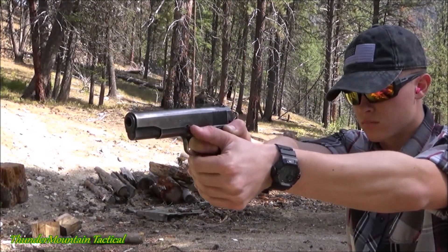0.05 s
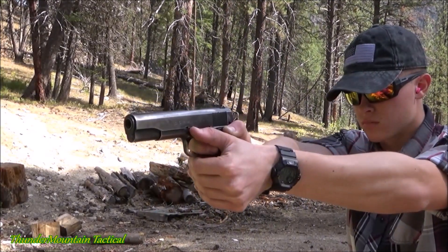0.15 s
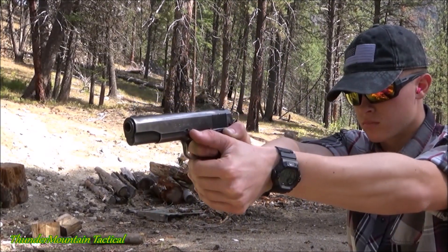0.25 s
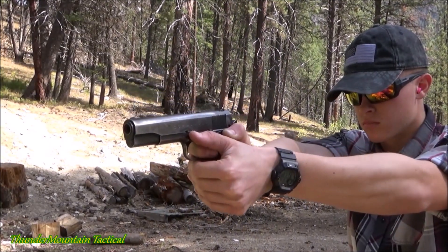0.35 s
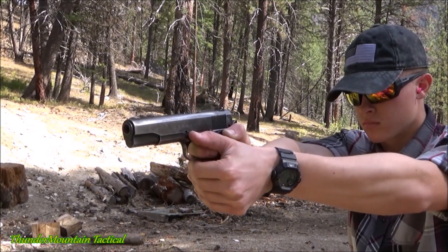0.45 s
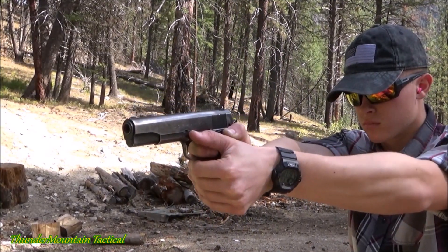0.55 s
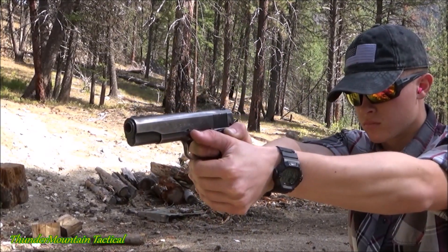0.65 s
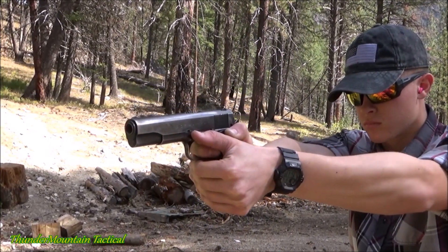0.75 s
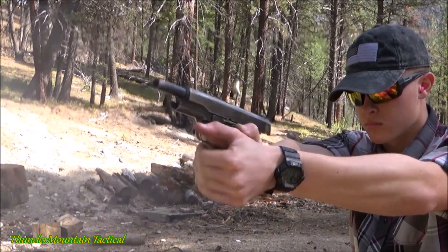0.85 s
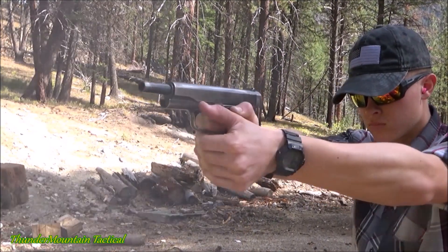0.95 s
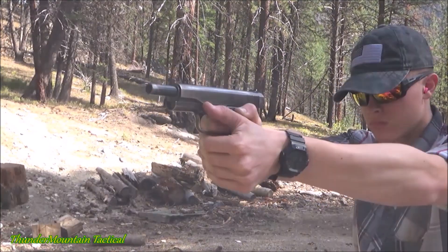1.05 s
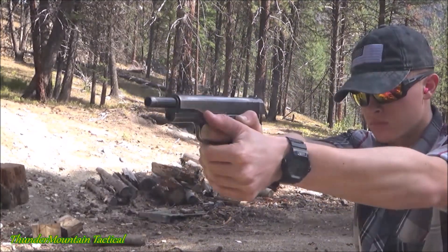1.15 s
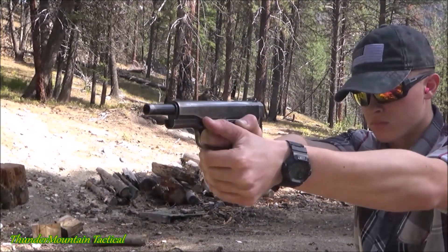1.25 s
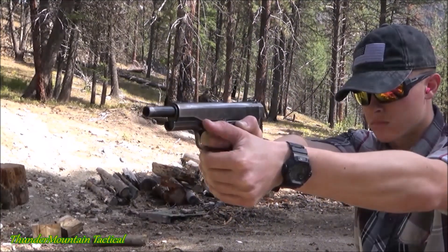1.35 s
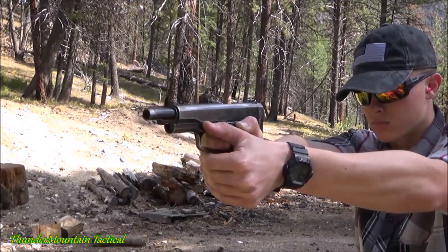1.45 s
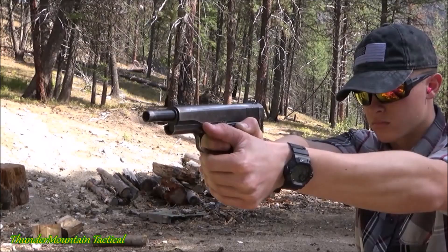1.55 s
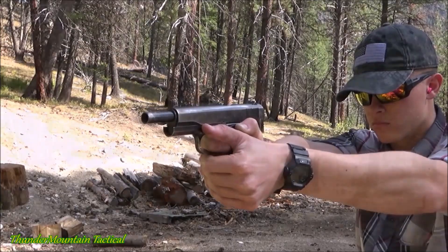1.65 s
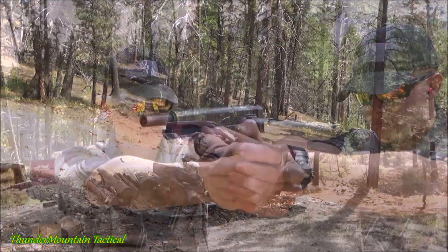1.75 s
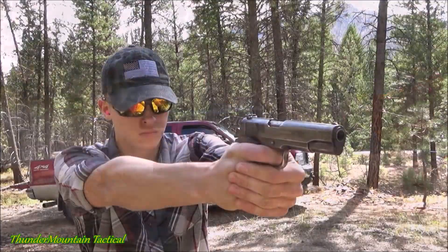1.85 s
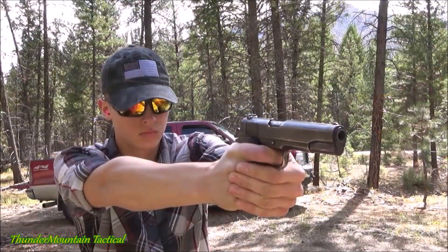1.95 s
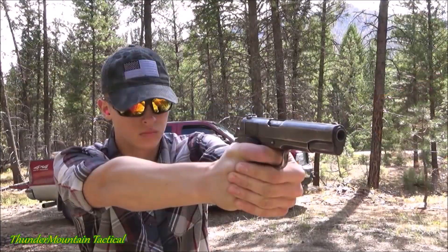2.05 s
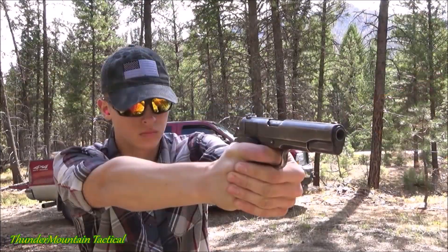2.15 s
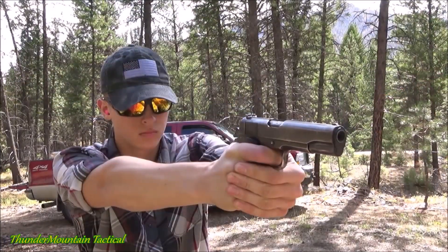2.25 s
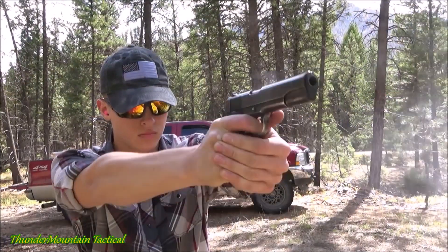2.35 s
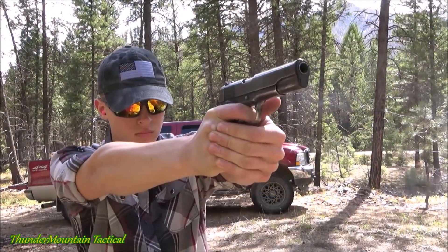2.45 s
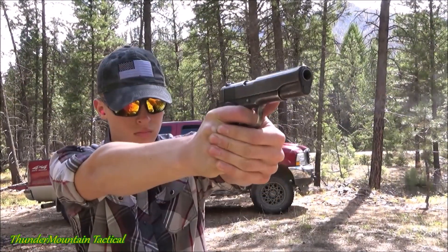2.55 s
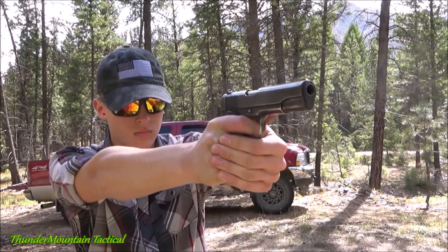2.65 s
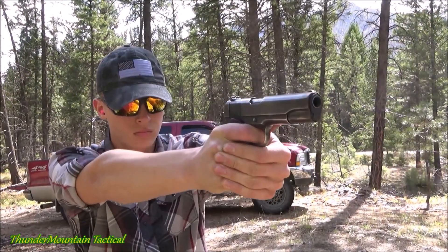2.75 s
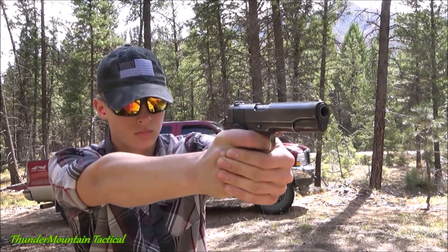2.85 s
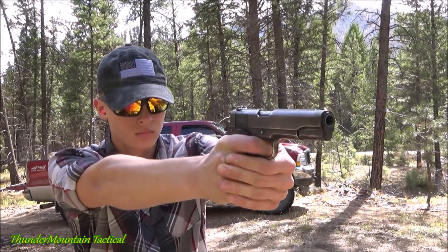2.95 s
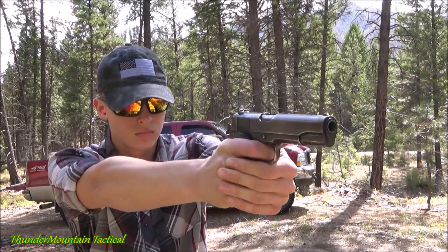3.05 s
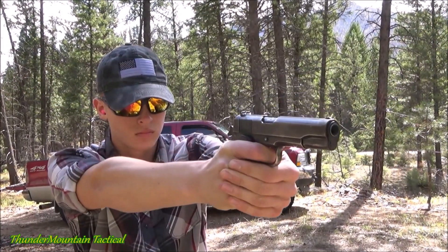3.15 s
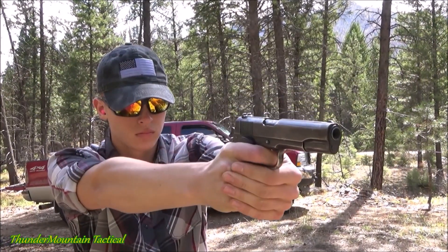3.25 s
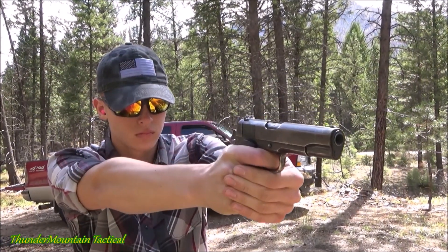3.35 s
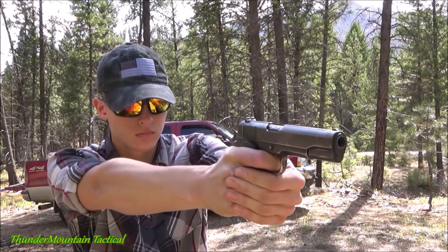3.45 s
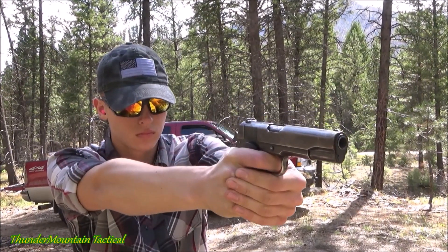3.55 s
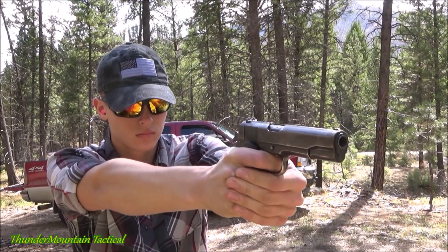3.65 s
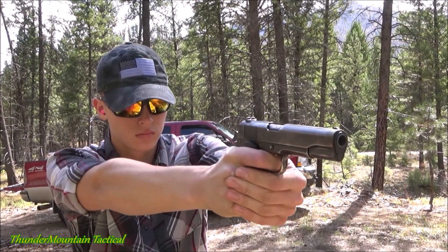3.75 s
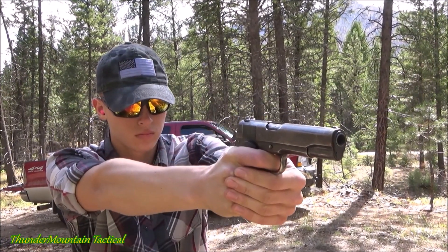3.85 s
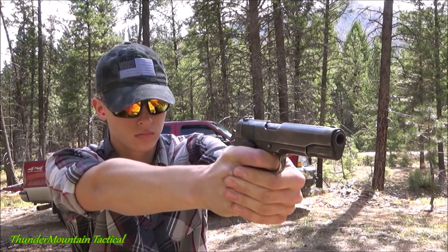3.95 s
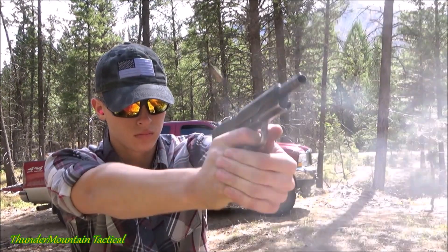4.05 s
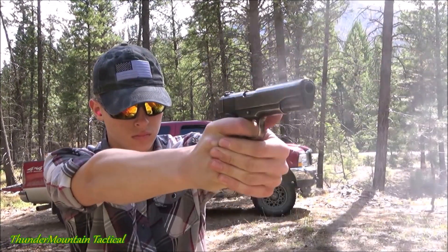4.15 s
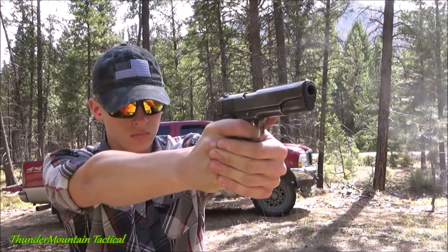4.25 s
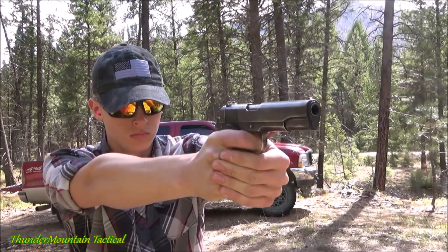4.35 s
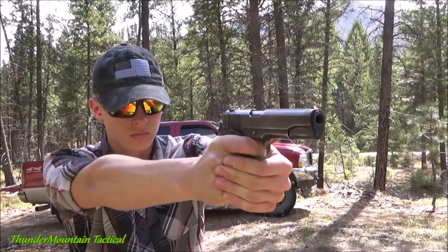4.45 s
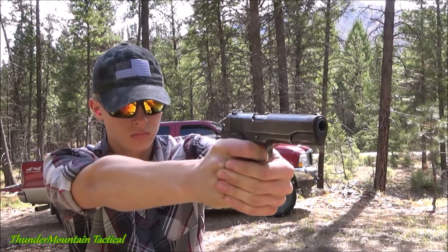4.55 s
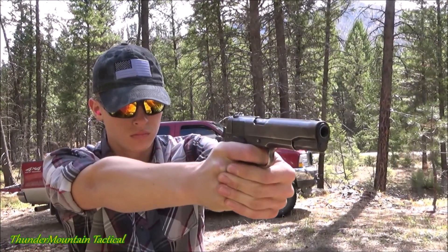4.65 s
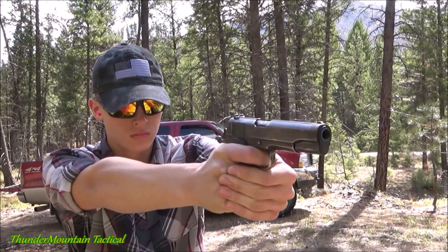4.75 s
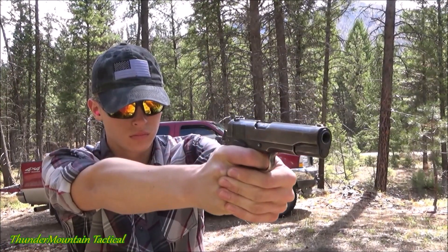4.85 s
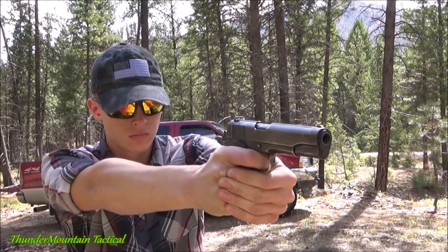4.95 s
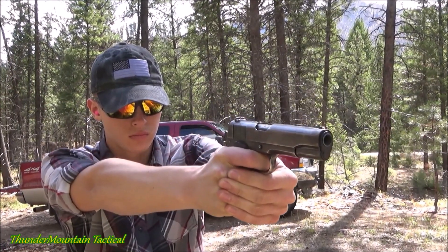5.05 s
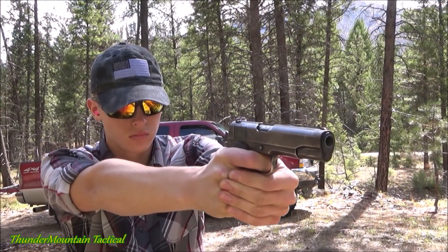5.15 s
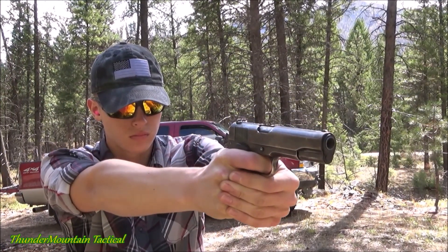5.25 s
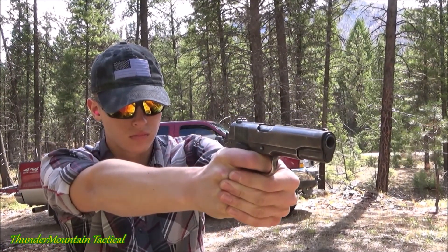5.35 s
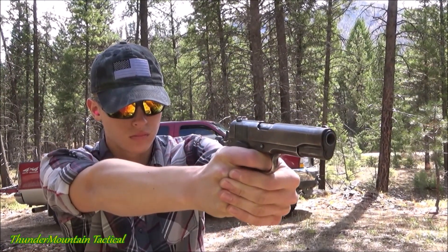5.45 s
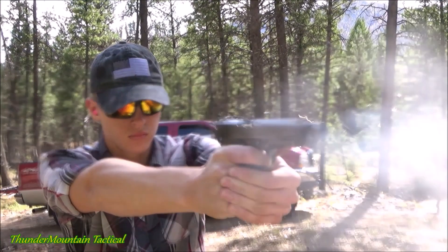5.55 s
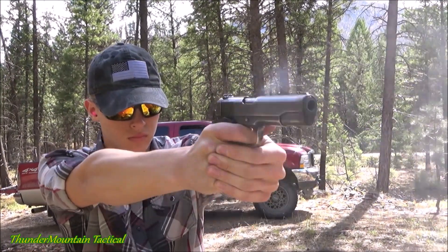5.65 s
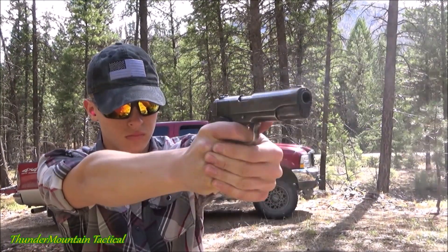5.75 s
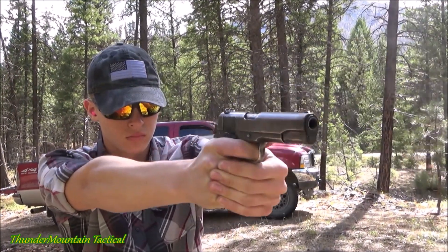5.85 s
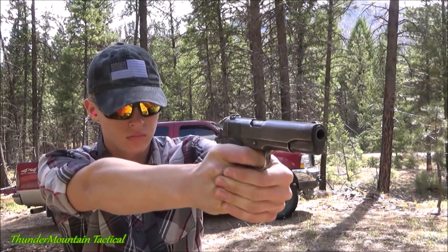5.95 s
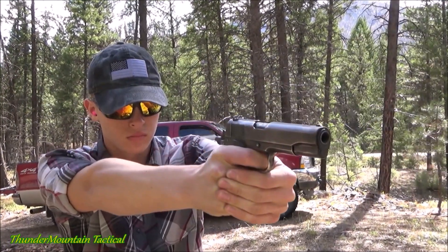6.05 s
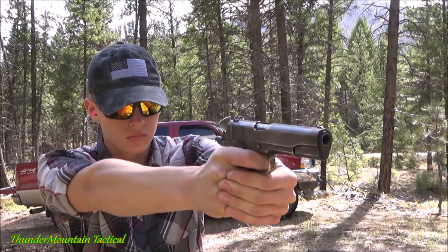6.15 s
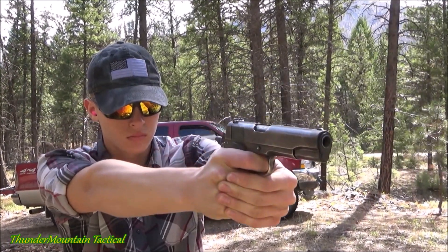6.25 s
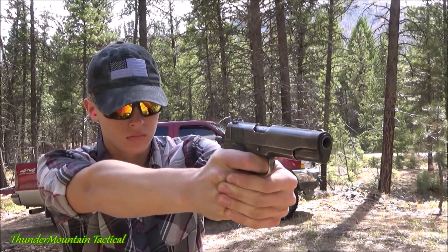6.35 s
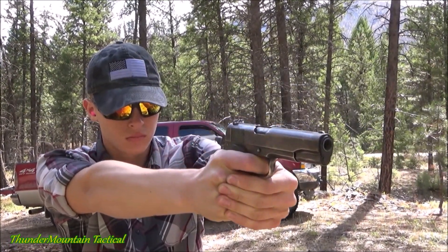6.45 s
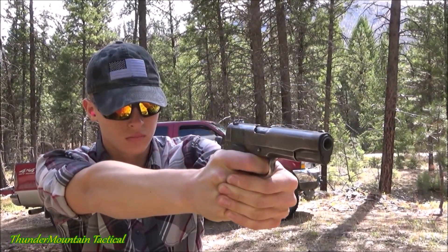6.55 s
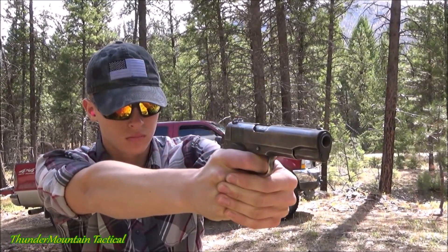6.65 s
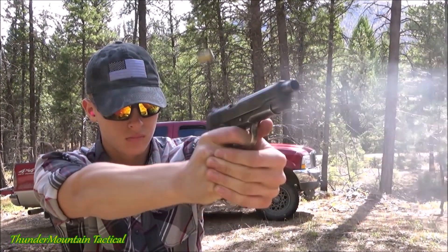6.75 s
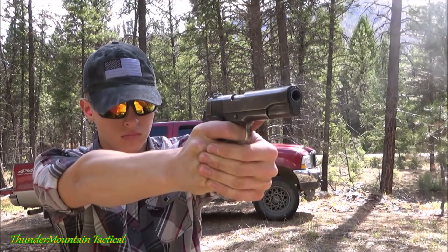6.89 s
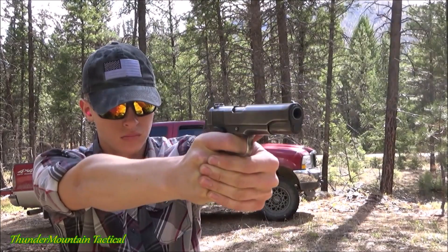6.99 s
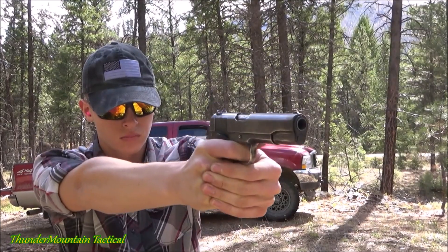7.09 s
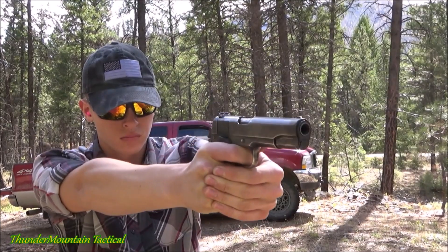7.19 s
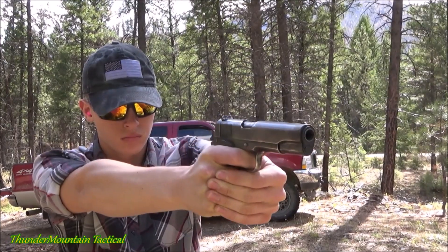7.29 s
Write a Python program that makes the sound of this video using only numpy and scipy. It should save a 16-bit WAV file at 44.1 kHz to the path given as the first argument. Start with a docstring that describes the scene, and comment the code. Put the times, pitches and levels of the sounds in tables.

```python
"""Pistol shots on a forest range

A pistol fires five times close by while the echo of an earlier shot is still dying away. Each blast
overloads the microphone, booms off the ground and rolls back from the same trunks and hillsides.
Spent brass lands with a ping. After the first of the five, we jump to a second, hissier position."""
import sys
import numpy as np
from scipy import signal
from scipy.fft import rfft, irfft, next_fast_len
from scipy.io import wavfile
from scipy.ndimage import uniform_filter1d

SR = 44100
rng = np.random.default_rng(int(sys.argv[2]) if len(sys.argv) > 2 else 0)


def bounce(signal):
    """Save signal as a 16-bit WAV file at the path given by the first command-line argument."""
    frames = np.transpose(np.atleast_2d(signal))
    limited = np.clip(frames, -1, 1)
    pcm = np.round(limited * 32767).astype(np.int16)
    wavfile.write(sys.argv[1], SR, pcm)


N = 322809
SHORT, LONG = 16384, 98304  # samples in a close sound and in a forest tail
AGE = np.arange(LONG) / SR  # seconds since a sound began


def amp(db):
    return 10 ** (np.asarray(db) / 20)


def curve_at(points, hz):
    """Reads a curve between its points, on a log-frequency axis."""
    pitches, values = np.transpose(points)
    return np.interp(np.log(hz + 1), np.log(pitches), values)


def pan(db):
    """Channel gains that put the left db above the right."""
    return amp(np.array([[db], [-db]]) / 2)


def add(mix, s, sound):
    """Mixes a sound in at s seconds, which may lie before the start."""
    at = round(s * SR)
    part, sound = mix[:, max(at, 0):], sound[..., max(-at, 0):]
    part[:, :sound.shape[-1]] += sound[..., :part.shape[-1]]


def envelope(t, db, rise_s, hold_s, fall_db_per_s, spread_db=0, curve=1):
    """Rises, holds until hold_s, then falls steadily and by spread_db for each doubling of the path."""
    late = np.maximum(t, hold_s)
    rise = np.clip(t / rise_s, 0, 1) ** curve
    return rise * amp(db - fall_db_per_s * (late - hold_s) - spread_db * np.log2(late / hold_s))


def colour(x, eq):
    """A causal EQ of unit energy: it shapes the tone of white noise and keeps its level."""
    size = x.shape[-1]
    gain = amp(curve_at(eq, abs(np.fft.fftfreq(size, 1 / SR))))
    gain /= np.sqrt(np.mean(gain ** 2))
    minimum_phase = np.exp(np.conj(signal.hilbert(np.log(gain))))
    return irfft(rfft(x) * minimum_phase[:size // 2 + 1], size)


def blend(shared, fresh, likeness):
    """Noise that resembles shared by the given likeness in each band; fresh supplies the rest."""
    size = shared.shape[-1]
    alike = np.clip(curve_at(likeness, np.fft.rfftfreq(size, 1 / SR)), -1, 1)
    return irfft(alike * rfft(shared) + np.sqrt(1 - alike ** 2) * rfft(fresh), size)


def evened(x, size=2048):
    """Spreads the strength of a noise evenly over every pitch."""
    for _ in range(3):
        bands = signal.stft(x, nperseg=size)[2]
        x = signal.istft(bands / (abs(bands) + 1e-12), nperseg=size)[1]
    return x / x.std()


# Stereo width. Each row: frequency in Hz, likeness of left and right from 0 to 1.
STEREO_LIKENESS = [(60, 0.55), (160, 1), (350, 0.98), (800, 0.75), (2000, 0.47), (5000, 0.45), (9000, 0.73),
                   (13000, 1)]

def noise(size):
    """Diffuse white noise at the two microphones."""
    left, fresh = rng.standard_normal((2, size))
    return np.array([left, blend(left, fresh, STEREO_LIKENESS)])


def burst(hz, t60, octaves):
    """A dying puff of noise around one pitch."""
    bins = np.fft.rfftfreq(SHORT, 1 / SR)
    band = np.exp(-(np.log2((bins + 1) / hz) / octaves) ** 2 / 2)
    puff = irfft(rfft(noise(SHORT)) * band)
    return puff / puff.std() * amp(-60 * AGE[:SHORT] / t60)


def knock(hz, t60, octaves=0.81):
    """A burst with an attack: the longer it lasts, the softer it starts."""
    return burst(hz, t60, octaves) * np.minimum(AGE[:SHORT] / (t60 * 0.071), 1)


# The tone of the breeze and of the hiss. Each row: frequency in Hz, relative level in dB.
BREEZE_EQ = [(20, -14), (70, -10.5), (160, -4), (350, -1.5), (650, 0.5), (1100, -7.5), (2000, -9.5),
             (4000, -26.5), (16000, -38.5)]
HISS_EQ = [(100, 3), (3000, 6.5), (6000, 0), (10000, -1), (16000, -7.5)]
# Buffets of air on the microphone ports: wind, and at 2.42 s the muzzle blast of the shot at 2.4 s. Each row:
# midpoint in seconds, length in seconds, level in dB.
GUSTS = [(0.542, 0.07, -63), (.69, 0.039, -65), (1.179, 0.28, -54), (1.703, 0.025, -58), (1.932, .12, -62),
         (2.42, .04, -37.5)]

def background(breeze_db=-61, first_hiss_db=-77, second_hiss_db=-71, hiss_step_s=1.81, draught_db=-76):
    """The bed: air in the trees, small gusts on each microphone port, and the microphone's own hiss."""
    t = np.arange(N) / SR
    size = next_fast_len(N)
    hiss = colour(noise(size), HISS_EQ)[:, :N]
    hiss *= amp(np.where(t < hiss_step_s, first_hiss_db, second_hiss_db))
    rumble_eq = [(20, -12.5), (65, -4.5), (130, -10.0), (400, -49.5)]
    rumble = colour(rng.standard_normal((2, size)), rumble_eq)[:, :N]
    swells = sum(amp(db) * np.exp(-(2 * (t - s) / length) ** 2) for s, length, db in GUSTS)
    breeze = amp(breeze_db) * colour(noise(size), BREEZE_EQ)[:, :N]
    return breeze + hiss + rumble * (amp(draught_db) + swells)


# Ticks of bouncing brass, trigger and grip. Each row: start in seconds, level in dB, centre in Hz.
TICKS = [(.444, -45.5, 7000), (2.042, -54, 6000), (2.097, -44, 2800), (3.6544, -30, 4300),
         (3.9545, -55, 6500), (4.12, -51, 6360), (4.7935, -37.5, 6000), (4.9857, -49, 6030),
         (6.383, -54.5, 8000), (6.7449, -40.5, 4960)]
# A soft bump, then scuffs. Each row: start in seconds, level in dB, centre in Hz, T60 in seconds.
RUSTLES = [(.447, -39, 181, 0.05), (.66, -75, 8400, .25), (1.571, -46.5, 6000, 0.08),
           (5.248, -48.5, 5750, 0.21)]

def handling():
    """Small foley between shots: dry ticks with a faint bright tail, rustles and one bump."""
    out = np.zeros((2, N))
    for s, db, hz in TICKS:
        tick = knock(hz, t60=0.0086, octaves=0.88)
        tail = amp(-22.5) * knock(hz=8000, t60=0.09)
        add(out, s, amp(db) * (tick + tail))
    for s, db, hz, t60 in RUSTLES:
        add(out, s, amp(db) * knock(hz, t60, octaves=0.66))
    return out


# Spent cases landing. Each row: start in seconds, click level in dB, click centre in Hz,
# grit level in dB, then the levels of the low, middle and high ring in dB.
LANDINGS = [(0.1148, -19.5, 5540, -53, -45, -46, -45), (1.5795, -23, 5700, -43, -58, -47, -56),
            (3.4772, -15, 4800, -40.5, -36, -49, -50), (4.7817, -16.5, 5100, -40, -32, -52, -51),
            (6.1672, -20.5, 5470, -43, -36, -55, -47), (7.2851, -21, 5000, -46, -37, -61, -52)]
# The low, middle and high ring of a case. Each row: pitch in Hz, T60 in seconds.
BRASS_MODES = [(4100, .045), (5227, .105), (8895, .08)]

def cases():
    """A hard click on stony ground, a short scatter of grit, and the ring of the brass tube."""
    out, t = np.zeros((2, N)), AGE[:SHORT]
    for s, click_db, click_hz, grit_db, *rings_db in LANDINGS:
        click = burst(click_hz, t60=0.0065, octaves=0.53)
        click = 0.56 * click[0] + 0.2 * click  # narrowed towards mono
        grit = burst(hz=6500, t60=0.066, octaves=0.88)
        sound = amp(click_db) * click + amp(grit_db) * grit
        for (hz, t60), db in zip(BRASS_MODES, rings_db):  # how a case lands decides which modes ring
            cycles = hz * t + rng.random() + 0.085 * rng.random((2, 1))
            sound += amp(db - 60 * t / t60) * np.sin(2 * np.pi * cycles)
        add(out, s, sound * np.minimum(t / 0.00032, 1))
    return out


# Slapback off trunks and banks. Each row: delay in seconds, level in dB, left over right in dB.
SLAPS = [(.0275, 1, 7.5), (0.048, -3, -6.5), (.159, -0.5, -5), (.2065, -7, -18), (.243, -6, -13),
         (.279, -0.5, 7), (.348, -5.5, -8), (0.461, -6, 1)]
# Its dull tone. Each row: frequency in Hz, relative level in dB.
SLAP_EQ = [(40, -39), (250, -17.5), (600, 10), (1200, 3), (2500, -7.5), (5000, -14.5), (12000, -40.5)]

def trunks(far_count=10, far_from_s=0.3, far_span_s=0.6, far_db=-8.5, far_side_db=7.5):
    """One dull copy of the blast per strong reflector; far ones stand at random, weaker with distance."""
    taps = np.zeros((2, LONG))
    for s, db, side_db in SLAPS:
        add(taps, s, amp(db) * pan(side_db))
    for k, (place, side) in enumerate(rng.random((far_count, 2))):
        s = far_from_s + far_span_s * (k + place) / far_count
        add(taps, s, amp(far_db) * far_from_s / s * pan(far_side_db * (2 * side - 1)))
    return colour(taps, SLAP_EQ)


def tree_clumps(lump_db=1, roll_db=1.08, lump_samples=90):
    """Trees stand in groups, so their echoes arrive in lumps of a few milliseconds within slower rolls."""
    lumps = uniform_filter1d(noise(LONG), lump_samples)
    rolls = uniform_filter1d(rng.standard_normal(LONG), lump_samples * 10)
    flutter_db = lump_db * lumps / lumps.std() + roll_db * rolls / rolls.std()
    gain = amp(flutter_db * np.minimum(AGE / 0.18, 1))
    return gain / np.sqrt(np.mean(gain ** 2))


# The tone of the forest tail. Each row: frequency in Hz, relative level in dB.
FOREST_EQ = [(20, -39.5), (70, -17), (150, -11.5), (260, -9), (420, -2.5), (680, 2), (1100, 1.5),
             (1600, -3.5), (2400, -2), (3500, -4), (6500, -6), (10000, -14), (16000, -30.5)]
# Its damping on the way. Each row: frequency in Hz, loss added to the overall decay in dB per second.
AIR_LOSS = [(100, 19.5), (350, -4.5), (800, -2), (1500, 4), (2500, 13), (4200, 29), (7500, 58),
            (11000, 72.5), (16000, 152)]

def forest(paths, slaps, tilt_db, fading_db_per_s, side_db):
    """The tail swells briefly after the blast; the later an echo, the more treble the air takes."""
    swell = envelope(AGE, db=-20.5, rise_s=0.13, hold_s=0.2, fall_db_per_s=19, spread_db=1.88, curve=0.78)
    hz, t, bands = signal.stft(colour(paths, FOREST_EQ) * swell + slaps, SR, nperseg=256)
    loss_db = (curve_at(AIR_LOSS, hz)[:, None] + fading_db_per_s) * t
    treble_db = tilt_db * np.log2(1 + hz / 1000)[:, None]
    lean_db = side_db * np.exp(-(hz / 1800) ** 2)  # the hillside on one side returns mostly the low body
    balance = amp(np.array([lean_db, -lean_db]) / 2)[..., None]
    return signal.istft(bands * amp(treble_db - loss_db) * balance, SR, nperseg=256)[1][:, :LONG]


# The blast's low end, direct and off the slopes. Each row: midpoint in seconds after the shot,
# level in dB, pitch in Hz, left over right in dB.
THUDS = [(.006, -40, 48, 0), (.015, -26.5, 180, -2), (.04, -29, 260, 5.5), (.076, -25.5, 262, -5.5),
         (.115, -32.5, 175, 3), (0.391, -43, 91.5, -1)]

def thuds(width_cycles=0.7):
    """Each thud is one push and one pull of air, from its own side."""
    out = np.zeros((2, LONG))
    for s, db, hz, side_db in THUDS:
        cycles = hz * (s - AGE)
        out += amp(db) * pan(side_db) * np.sin(2 * np.pi * cycles) * np.exp(-(cycles / width_cycles) ** 2)
    return out


# The tone of the boom. Each row: frequency in Hz, relative level in dB.
BOOM_EQ = [(20, -30), (70, -19), (150, -12.5), (270, -3), (380, -2), (700, 0), (1200, -1), (1600, -10),
           (2600, -12.5), (6000, -38.5)]
# Its ring. Each row: pitch in Hz, level in dB, T60 in seconds.
BOOM_MODES = [(375.6, -25, 0.37), (485, -21, 0.21), (712, -8.5, 0.1), (1020, -24.5, 0.053),
              (1288, -18.5, 0.19)]

def boom(paths, phases, rise_s=0.011, slope_delay_s=0.067):
    """The body: close reflections pile up, ring briefly and return once from the nearest slope."""
    t = AGE[:SHORT]
    ground = envelope(t, db=-19, rise_s=rise_s, hold_s=0.027, fall_db_per_s=230)
    slope = envelope(t - slope_delay_s, db=-26.5, rise_s=rise_s, hold_s=0.053, fall_db_per_s=190)
    ring = sum(amp(db - 60 * t / t60) * np.sin(2 * np.pi * hz * t + phase)
               for (hz, db, t60), phase in zip(BOOM_MODES, phases))
    ring_attack = 1 - np.exp(-(t / 0.013) ** 2)
    return colour(paths, BOOM_EQ) * np.hypot(ground, slope) + ring * ring_attack


# The tone of the muzzle crack and its scatter. Each row: frequency in Hz, relative level in dB.
CRACK_EQ = [(30, -39), (200, -11.5), (600, -14.5), (1300, 5.5), (2500, 0.5), (4500, 0.5), (7000, 1),
            (9500, -1), (12000, -7.5), (16000, -18)]

def crack(ceiling_db=-11.5, crossfeed=0.095, clearing_s=0.22):
    """The attack: shock waves saturate the microphone, and their scatter off stones and brush thins out."""
    t = AGE[:SHORT]
    direct = envelope(t, db=-12.5, rise_s=0.0004, hold_s=0.009, fall_db_per_s=2000)
    scatter = envelope(t, db=-20, rise_s=0.018, hold_s=0.018, fall_db_per_s=0, spread_db=5.5)
    scatter *= np.exp(-(t / clearing_s) ** 4)  # it ends at the edge of the clearing
    blast = colour(noise(SHORT), CRACK_EQ) * np.hypot(direct, scatter)
    blast += crossfeed * (blast[::-1] - blast)  # narrows the image a little
    return amp(ceiling_db) * np.tanh(blast / amp(ceiling_db))


# The shots; the earliest leaves only its tail. Each row: start in seconds, crack, boom and forest gains
# in dB, then the tail's treble tilt in dB per octave, extra fade in dB per second, left over right in dB.
SHOTS = [(-0.53, -2, 0, -4, -1, -2, -0.5), (0.9587, -1, -0.5, 0, -0.38, 2.5, -.5),
         (2.4, -1.5, -0.5, -0.9, 0.5, -1, -2), (4.1549, -1.5, -0.5, -1, 0.5, 0, -2),
         (5.6499, -1, -0.5, -1.4, 0.5, 1, -1.5), (6.7715, -1, -0.5, -1.5, 0.5, 4.5, -2)]
# What the shots' reflections have in common. Each row: frequency in Hz, likeness from 0 to 1.
SHOT_LIKENESS = [(100, 0.95), (900, 0.91), (2500, 0.85), (6000, 0.21), (12000, 0.12)]

def gunfire(jump_s=2.05, jump_fade_s=0.0047, slide_delay_s=0.058):
    """Crack, boom and forest tail: every shot travels the same paths, a little altered by moving air."""
    out = np.zeros((2, N))
    near, far = evened(noise(SHORT)), noise(LONG)
    clumps, slaps, low_end = tree_clumps(), trunks(), thuds()
    phases = rng.uniform(0, 2 * np.pi, len(BOOM_MODES))
    far_paths = blend(far, np.array([noise(LONG) for _ in SHOTS]), SHOT_LIKENESS) * clumps
    for paths, (s, crack_db, boom_db, forest_db, *tail_settings) in zip(far_paths, SHOTS):
        shot = amp(forest_db) * forest(paths, slaps, *tail_settings) + amp(boom_db) * low_end
        add(shot, 0, amp(crack_db) * crack())
        near_paths = blend(near, noise(SHORT), SHOT_LIKENESS)
        add(shot, 0, amp(boom_db) * boom(near_paths, phases))
        if s < jump_s:  # the first position faces the other way, and the jump ends its echoes
            shot = shot[::-1] * np.clip((jump_s - s - AGE) / jump_fade_s, 0, 1)
        else:  # the second position hears the slide slam shut
            add(shot, slide_delay_s, amp(-20.5) * knock(hz=7050, t60=0.056, octaves=0.65))
        add(out, s, shot)
    return out


def scene():
    return gunfire() + cases() + handling() + background()


def record(dry, ceiling_db=-5.5, cutoff_hz=16100):
    """Soft overload on the highest peaks, then a steep low-pass."""
    limited = dry / (1 + (dry / amp(ceiling_db)) ** 4) ** (1 / 4)
    lowpass = signal.firwin(255, cutoff_hz, window=("kaiser", 8), fs=SR)
    return signal.oaconvolve(limited, lowpass[None], "same")


dry = scene()
out = record(dry)
bounce(out)
```